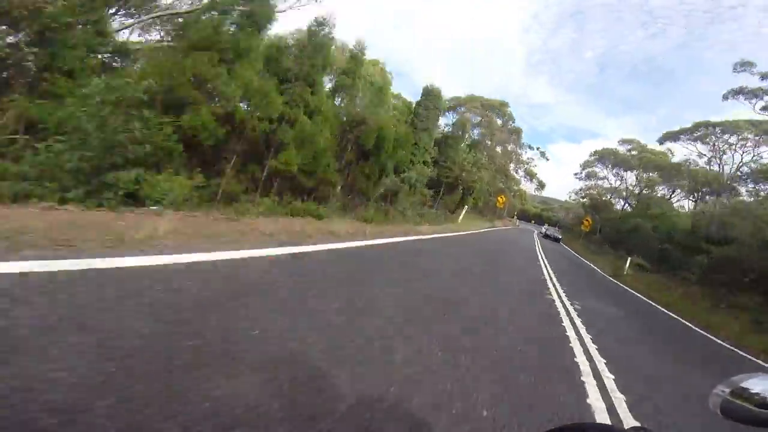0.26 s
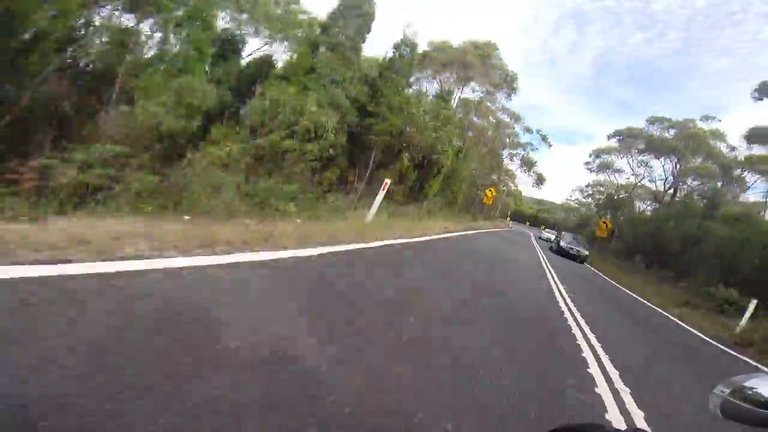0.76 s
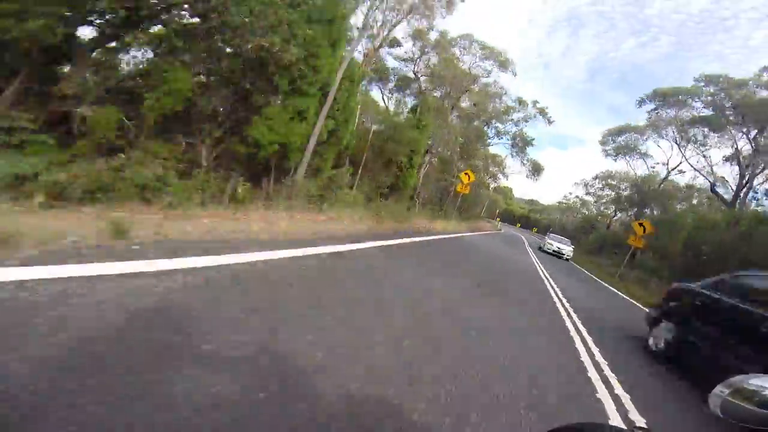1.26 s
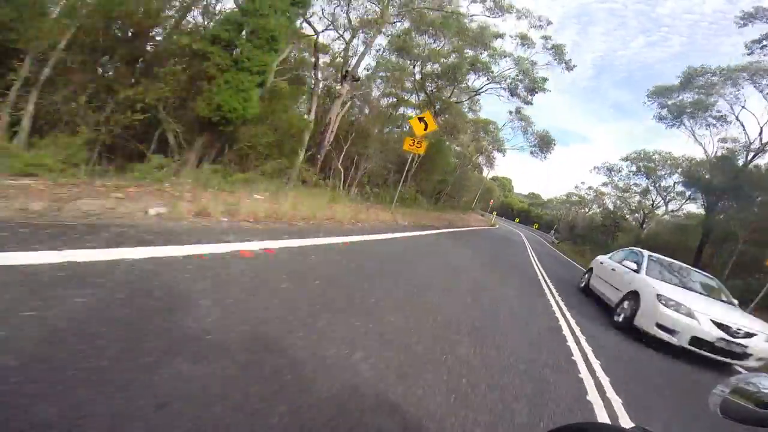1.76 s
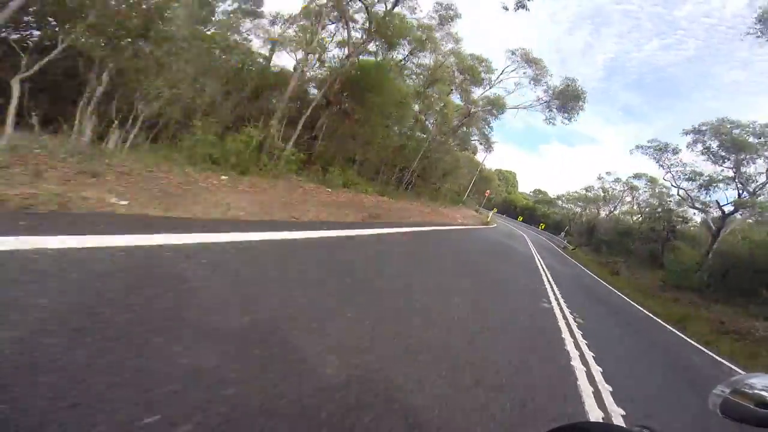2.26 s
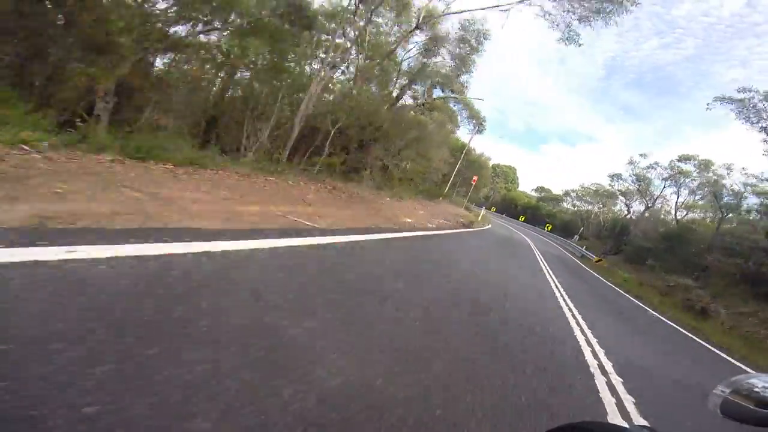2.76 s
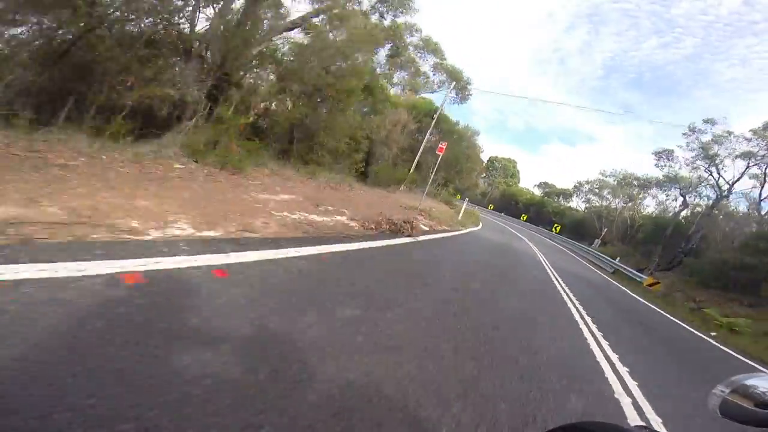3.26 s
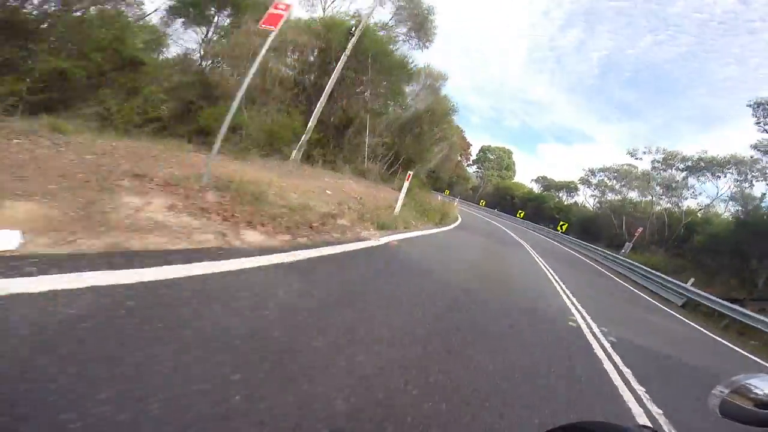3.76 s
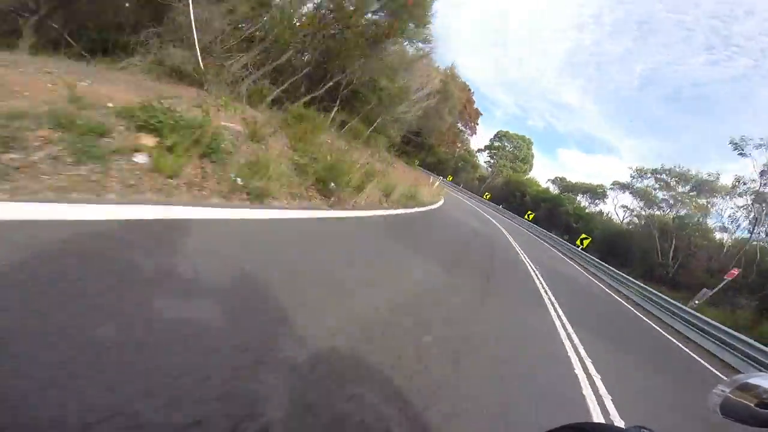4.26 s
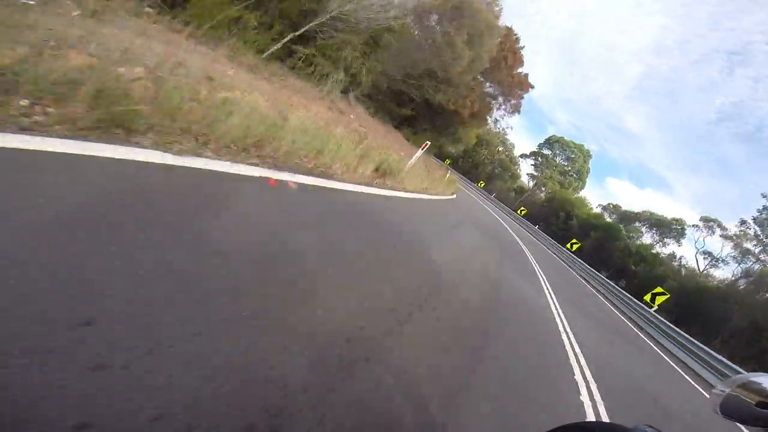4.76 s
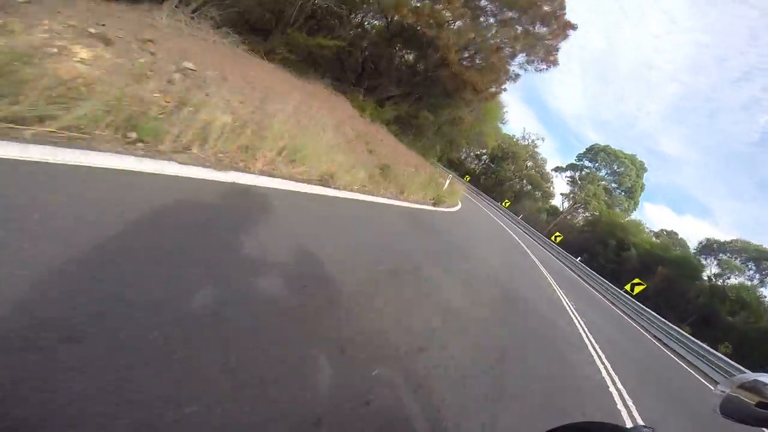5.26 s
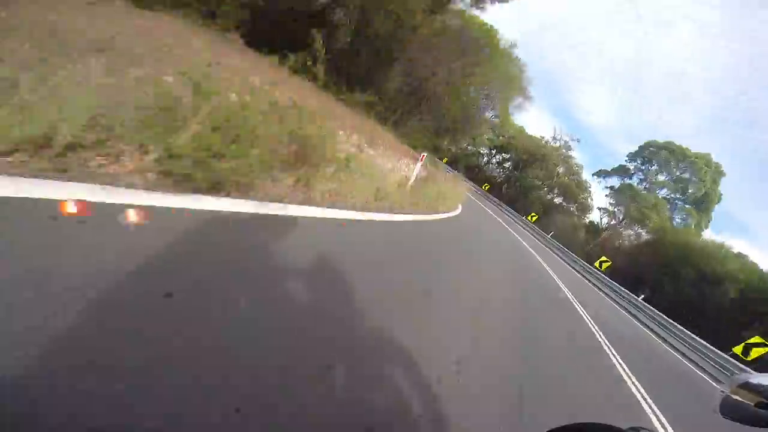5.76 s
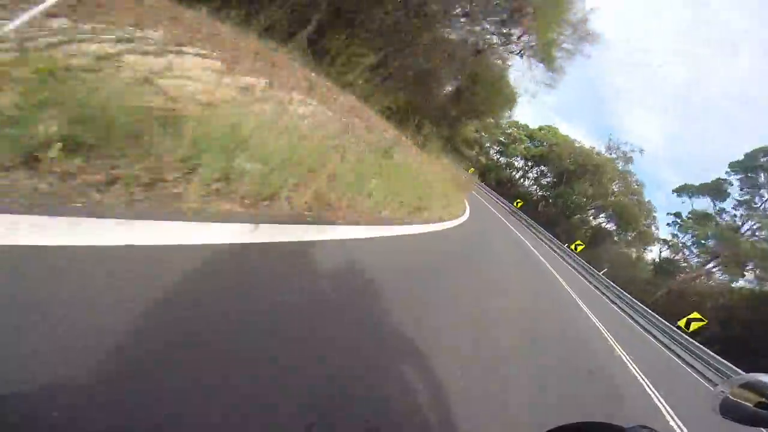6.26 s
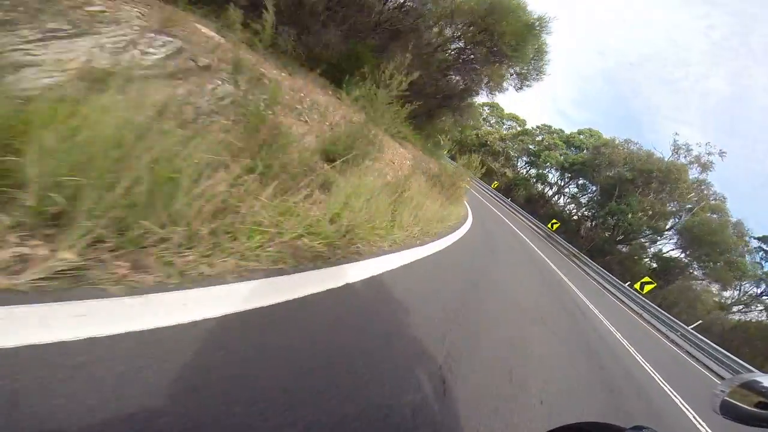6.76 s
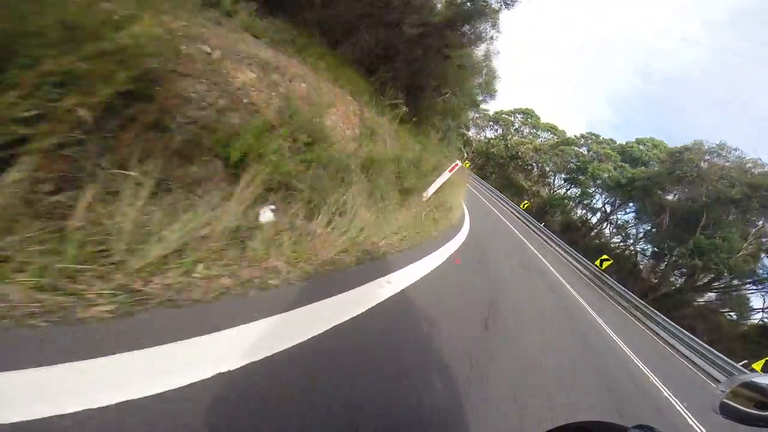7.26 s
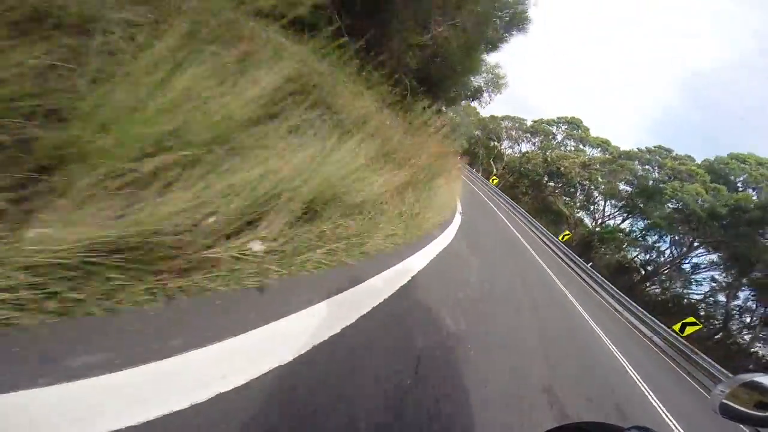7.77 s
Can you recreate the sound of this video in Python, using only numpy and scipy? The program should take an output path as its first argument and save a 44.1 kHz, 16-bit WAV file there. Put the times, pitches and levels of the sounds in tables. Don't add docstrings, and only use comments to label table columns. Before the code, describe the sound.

Muffled, boxy close sound of a V-twin motorcycle being ridden outdoors. Low throbbing engine vibration dominates, over lumpy tyre rumble and thin hiss. The pitch climbs slightly, blips downward at a gear change, slides lower while braking on the engine, then levels out. A tonal gear whine comes forward during slowing, while plasticky knocks and rattles become sparser.

```python
import sys
import numpy as np
from scipy import signal
from scipy.fft import rfft, irfft
from scipy.io import wavfile

SR = 44100
rng = np.random.default_rng(int(sys.argv[2]) if len(sys.argv) > 2 else 0)


def transcribe(signal):
    frames = np.atleast_2d(signal).T
    limited = np.clip(frames, -1, 1)
    pcm = np.round(limited * 32767).astype(np.int16)
    wavfile.write(sys.argv[1], SR, pcm)


def boost_factor(decibels):
    exponent = np.asarray(decibels, float) / 20
    return 10 ** exponent


N = 353152
MIDDLE_SPEED = 35

# pitch_hz, level_db (per Hz)
CASE_COLOUR = [(300, -19), (480, -8.5), (590, -5), (720, 5.5), (930, -1.5), (1110, -9.5), (1390, 2.5),
               (1580, 1), (1740, -13), (2000, -15), (2400, -25), (2650, -22), (3050, -38), (12000, -48)]
# pitch_hz, width_hz, level_db
AIR_MODES = [(2600, 120, 3), (3620, 200, 7), (4550, 200, 7), (5900, 250, 8), (7050, 450, 10)]
# multiple (of the cycle rate), level_db, pulling_change_db, braking_change_db
STRONG_ORDERS = [(2, -1.5, -1, 1), (3, -5.5, 2, -9), (4, 0.5, -3, 0), (8, 0.5, -8, .5)]


def rms_one(x):
    return x / np.sqrt(np.mean(x ** 2) + 1e-20)


def in_time(rows):
    s, *columns = np.transpose(rows)
    return [np.interp(np.arange(N) / SR, s, column) for column in columns]


def at_hz(points, hz):
    point_hz, point_db = np.transpose(points)
    return np.interp(np.log(np.maximum(hz, 1)), np.log(point_hz), point_db)


def drift(rate):
    r = np.exp(-80 * np.pi * rate / SR)
    slow = signal.lfilter([1], [1, -2 * r, r * r], rng.standard_normal(N // 40 + 2002))[2000:]
    return np.interp(np.arange(N) / 40, np.arange(len(slow)), rms_one(slow))


def colour(x, points, modes=()):
    size = 16384
    hz = np.arange(size // 2 + 1) * SR / size
    db = at_hz(points, hz)
    for mode_hz, width_hz, peak_db in modes:
        db = db + peak_db / (1 + (2 * (hz - mode_hz) / width_hz) ** 2)
    cepstrum = irfft(np.log(boost_factor(db)), size)
    cepstrum[1:size // 2] *= 2
    cepstrum[size // 2 + 1:] = 0
    response = irfft(np.exp(rfft(cepstrum)), size)[:size // 2]
    return signal.fftconvolve(x, response)[:N]


def order(cycles, multiple, level_db, wobble_db, wander, rate, spread=1):
    phase = 2 * np.pi * (multiple * cycles + spread * rng.random()) + wander * drift(rate)
    return -np.sqrt(2) * boost_factor(level_db + wobble_db * drift(rate)) * np.cos(phase)


def engine_speed():
    # time_s, speed (cycles per s)
    revs = [(0.0, 38.97), (0.48, 39.3), (0.62, 40.02), (1.34, 41.5), (1.8, 40.35), (2.35, 38.62),
            (2.65, 36.95), (2.95, 35.7), (3.7, 33.2), (4.3, 30.85), (4.75, 30.35), (4.9, 29.7),
            (5.5, 29.75), (6.4, 29.75), (6.9, 29.1), (7.05, 28.7), (7.6, 28.42), (8.01, 29.17)]
    shift_s, sag_cycles, spread_s = 1.625, 2.5, 0.058
    sag = sag_cycles * np.exp(-0.5 * ((np.arange(N) / SR - shift_s) / spread_s) ** 2)
    return in_time(revs)[0] - sag + 0.05 * drift(4.0)


def with_load(pull_db, brake_db):
    # time_s, load (1 pulling, 0 coasting along, -1 engine braking)
    throttle = [(0, -0.11), (.6, 0.21), (.75, 1), (1.45, .9), (1.58, -.7), (2.5, -0.99), (3.5, -1.3),
                (4.1, -1.2), (4.8, -0.81), (5.25, -0.77), (5.4, 0.032), (6.2, 0.24), (6.9, 0.13),
                (7.4, 0.22), (7.7, .2), (8.01, 0.19)]
    load, = in_time(throttle)
    return pull_db * np.maximum(load, 0) + brake_db * np.maximum(-load, 0)


def strong_db(row, speed):
    # pitch_hz, level_db
    sway = [(58, -30), (70, -15), (82, -17.5), (100, -16.5), (119, -10.5), (136, -16.5), (152, -25.5),
            (168, -22)]
    # pitch_hz, level_db
    buzz = [(228, -31.5), (255, -32.5), (275, -23.5), (300, -20.5), (330, -22)]
    multiple, db, pull_db, brake_db = row
    response_db = at_hz(sway if multiple < 6 else buzz, round(multiple) * speed)
    return db + with_load(pull_db, brake_db) + response_db


def background(speed, db, per_speed_db, roughness_share, patchy_db):
    # time_s, level_db
    roughness = [(0, 8), (.2, 3.5), (.6, 0.5), (1.05, -5), (1.5, -0.5), (2.0, -3.5), (2.55, 2.5), (3.0, -3),
                 (3.5, .0), (4.0, -3), (4.6, -3), (5.2, .0), (5.7, .0), (6.2, -2), (6.9, 3), (7.5, 6.5),
                 (7.75, -0.5), (8.01, 7)]
    speed_db = per_speed_db * (speed - MIDDLE_SPEED)
    return db + speed_db + roughness_share * in_time(roughness)[0] + patchy_db * drift(3.0)


def road(speed):
    # pitch_hz, level_db (per Hz)
    rumble_colour = [(15, -25), (30, -8.5), (50, -5.5), (75, 4), (100, -1.5), (130, 2), (175, -4.5),
                     (205, -7.5), (230, -15.5), (300, -9.5), (400, -18), (470, -22), (600, -59)]
    # pitch_hz, level_db (per Hz)
    ring_colour = [(100, -38), (150, -6.5), (175, 6.5), (195, 1.5), (215, -17.5), (300, -53.5)]
    rumble_db = background(speed, db=-25, per_speed_db=0.35, roughness_share=0.66, patchy_db=1.5)
    ring_db = background(speed, db=-33, per_speed_db=0.88, roughness_share=0.45, patchy_db=2)
    rumble = rms_one(colour(rng.standard_normal(N), rumble_colour))
    rumble *= boost_factor(rumble_db + 2.5 + 1.3 * drift(5.7))
    ring = boost_factor(ring_db + 0.5) * rms_one(colour(rng.standard_normal(N), ring_colour))
    return signal.sosfilt(signal.butter(6, 800, fs=SR, output="sos"), rumble + ring)


def tread():
    # time_s, pitch_hz, level_db
    hum = [(0, 167, -25), (.6, 170.3, -23.5), (1.5, 175.6, -26), (1.9, 173, -21.5), (2.3, 168, -26.5),
           (2.7, 164.6, -20.5), (3.2, 157.4, -39.5), (8.01, 132.5, -48.5)]
    hz, db = in_time(hum)
    return order(np.cumsum(hz) / SR, 1, db, wobble_db=3.0, wander=0.43, rate=9.5)


def case_hiss(cycles, speed):
    # pitch_hz, level_db
    air_tilt = [(500, -1), (650, -10.5), (1600, -5), (2000, -2.5), (4000, -2), (7300, -1), (8000, -9),
                (10000, -6), (12500, -26)]
    clatter_db = background(speed, db=-44, per_speed_db=0.6, roughness_share=0.5, patchy_db=1.5)
    wind_db = background(speed, db=-63, per_speed_db=0.39, roughness_share=0.5, patchy_db=0.2)
    swell = boost_factor(1.5 * np.sin(4 * np.pi * cycles) + 1.2 * drift(25))
    hiss = colour(colour(swell * rng.standard_normal(N), air_tilt), CASE_COLOUR, AIR_MODES)
    clatter = signal.sosfilt(signal.butter(5, 3000, fs=SR, output="sos"), hiss)
    wind = signal.sosfilt(signal.butter(5, [2850, 11000], "band", fs=SR, output="sos"), hiss)
    return boost_factor(clatter_db + 8.5) * rms_one(clatter) + boost_factor(wind_db + 0.5) * rms_one(wind)


def knock_runs(speed):
    # start_s, peak_db
    hard_knocks = [(0.329, -18), (0.398, -24), (0.4319, -23), (0.5502, -18.5), (0.576, -16.5),
                   (0.8737, -21), (0.9211, -30), (1.0293, -24), (1.2153, -27.5), (1.273, -35),
                   (1.3094, -21.5), (1.5409, -31), (1.5893, -18.5), (1.643, -15.5), (1.8952, -26),
                   (2.3503, -27), (2.5075, -11.5), (2.5443, -29), (2.6262, -22.5), (2.6828, -22),
                   (2.7244, -22.5), (2.7686, -31.5), (2.8893, -20), (3.7918, -21.5), (3.822, -37.5),
                   (3.9765, -24.5), (4.0423, -23.5), (4.0728, -23.5), (4.7546, -31), (5.9484, -27)]
    light_per_s = 10.5 * boost_factor(2.1 * (speed - MIDDLE_SPEED))
    light = np.flatnonzero(rng.random(N) < light_per_s / SR)
    light_db = -29 + 4 * rng.standard_normal(N)[light]
    hard_s, hard_db = np.transpose(hard_knocks)
    starts = np.r_[np.round(hard_s * SR).astype(int), light]
    levels = np.r_[hard_db + 5.0, light_db]

    run_s, density, main_contact, main_contact_s = 0.0039, 0.069, 4.4, 0.0012
    shape = np.sin(np.pi * np.clip(np.arange(400) / SR / run_s, 0, 1)) ** 1.1
    runs = shape * (rng.random((200, 400)) < density) * rng.standard_normal((200, 400))
    runs[:, int(main_contact_s * SR)] = -main_contact
    out = np.zeros(N + 400)
    for start, level, run in zip(starts, levels, runs):
        out[start:start + 400] += boost_factor(level) * run / np.sqrt(np.sum(run ** 2) + 1e-9)
    return out[:N]


def ticks_and_knocks(motion, speed):
    # pitch_hz, level_db (per Hz)
    tick_colour = [(300, -12), (1000, -1.5), (1700, 2.5), (2300, -1.5), (3000, -20.5), (4500, -26),
                   (5500, -29.5), (7000, -44), (8000, -43.5), (11000, -44.5), (13000, -63)]
    beyond = (motion < -0.49) | (motion > 0.6)
    crossings = np.flatnonzero(np.diff(beyond))
    ticks = np.zeros(N)
    tick_gain = boost_factor(-25 + 3.5 * rng.standard_normal(N)[crossings])
    ticks[crossings] = tick_gain * np.diff(motion)[crossings] * 10
    bright = colour(ticks, [(1500, -4.5), (3000, 13), (8000, 21.5)])
    unit = np.max(np.abs(colour(np.eye(1, N)[0], tick_colour)))
    return colour(bright + knock_runs(speed), tick_colour, AIR_MODES[1:]) / unit


def valve_gear(cycles, speed):
    # share (of the cycle), level_db
    contacts = [(0.019, -2), (0.193, 1), (0.313, 0), (0.42, 1), (0.538, -4), (.62, 4.5), (0.718, 4),
                (0.861, 3.5)]
    # pitch_hz, width_hz, level_db
    panel_modes = [(712, 14, 2.5), (931.5, 29, 7.5)]
    taps_db = background(speed, db=-41.5, per_speed_db=0.14, roughness_share=0.25, patchy_db=1.5)
    clicks = np.zeros(N)
    turns = np.arange(int(cycles[-1]))
    for share, db in contacts:
        moments = turns + share + 0.0018 * rng.standard_normal(len(turns))
        at = np.interp(moments, cycles, np.arange(N)).astype(int)
        clicks[at] += boost_factor(db + 2.6 * rng.standard_normal(len(turns)))
    dull = signal.sosfilt(signal.butter(4, 1900, fs=SR, output="sos"), clicks)
    return boost_factor(taps_db + 4.5) * rms_one(colour(dull, CASE_COLOUR, panel_modes))


def bearing_db():
    # start_s, length_s, level_db (at the start), swell_db_per_s
    spells = [
        (1.66, 1, -43, 3),
        (2.911, 2.37, -39.5, -.5),
        (6.2, 1.45, -38, -0.5),
        (6.985, .67, -34.5, 5),
    ]
    edge_s, slack_db = 0.065, -55.5
    t = np.arange(N) / SR
    gain = boost_factor(slack_db)
    for start, length, db, swell_db in spells:
        inside_s = np.minimum(t - start, start + length - t)
        gain = gain + boost_factor(db + swell_db * (t - start)) * np.clip(inside_s / edge_s + 0.5, 0, 1)
    return 20 * np.log10(gain)


def gears(cycles, speed):
    # pitch_hz, level_db
    small_mesh = [(830, -1.5), (890, -1), (945, 4), (1010, -4.5), (1080, -5), (1125, 5)]
    # pitch_hz, level_db
    large_mesh = [(975, -45.5), (1010, -55.5), (1080, -50), (1200, -39), (1270, -37), (1310, -29.5),
                  (1400, -28)]
    # pitch_hz, level_db
    side_line = [(640, -34.5), (675, -18), (730, -16)]
    # pitch_hz, level_db
    upper_mesh = [(2380, -34), (2520, -20.5), (2750, -31), (4300, -55), (4550, -31.5), (4750, -46.5)]
    # pitch_hz, level_db
    panel_line = [(900, -60.5), (935, -46.5), (960, -46.5), (1000, -59)]
    small_db = bearing_db() + at_hz(small_mesh, 28 * speed)
    large_db = at_hz(large_mesh, 34 * speed)
    octave_dip = [(1650, 7), (1880, -2.5), (2050, 7.5), (2300, 3.5)]
    small_side = [(1040, -17), (1180, -7.5), (1300, -14)]
    lines = [
        (28, small_db),
        (56, small_db - 20.0 + at_hz(octave_dip, 56 * speed)),
        (72, small_db - 29.0),
        (36, small_db + at_hz(small_side, 36 * speed)),
        (34, large_db),
        (36, large_db - 14.5),
        (32, at_hz(panel_line, 32 * speed)),
        (33, at_hz(panel_line, 33 * speed)),
        (84, small_db + at_hz(upper_mesh, 84 * speed)),
        (140, small_db + at_hz(upper_mesh, 140 * speed)),
        (38, large_db - 12.5),
        (17, large_db - 14.5),
        (18, strong_db(STRONG_ORDERS[-1], speed) + at_hz(side_line, 18 * speed))]
    return sum(order(cycles, k, db, wobble_db=0.9, wander=0.2, rate=12) for k, db in lines)


def shaking(cycles, speed):
    # multiple (of the cycle rate), level_db
    weak_orders = [(1, -35.5), (5, -35), (6, -27), (7, -36), (9, -31), (10, -38), (11, -32), (12, -36.5),
                   (13, -36), (14, -35.5), (15, -37.5), (16, -44.5)]
    # pitch_hz, level_db
    frame_response = [(25, -4), (40, -2), (150, -7), (185, -3), (213, -7.5), (238, -3.5), (260, 0.5),
                      (300, 9), (340, -4), (400, -3.5), (450, -17), (520, -16.5), (650, -11.5)]
    lag = 0.08 * np.clip((4 * speed - 135) / 30, 0, 1)
    out = np.zeros(N)
    for row in STRONG_ORDERS[:3]:
        k = round(row[0])
        out += order(cycles - lag * (k > 3), k, strong_db(row, speed),
                     wobble_db=0.74, wander=0.17, rate=12.0, spread=0.12)
    out += order(cycles, 8, strong_db(STRONG_ORDERS[-1], speed),
                 wobble_db=2.17, wander=0.079, rate=9.5, spread=0.07)
    low_db = with_load(pull_db=-3, brake_db=0)
    high_db = with_load(pull_db=-3.5, brake_db=-0.5)
    for multiple, db in weak_orders:
        k = round(multiple)
        level_db = db + (low_db if k < 8 else high_db) + at_hz(frame_response, k * speed)
        if k == 6:
            level_db = level_db + with_load(pull_db=0, brake_db=4)
        out += order(cycles, k, level_db, wobble_db=2.0, wander=0.49, rate=4.2)
    return out


def scene():
    speed = engine_speed()
    cycles = np.cumsum(speed) / SR
    motion = road(speed) + tread() + shaking(cycles, speed)
    body = case_hiss(cycles, speed) + valve_gear(cycles, speed) + gears(cycles, speed)
    return (motion + body + ticks_and_knocks(motion, speed))[None]


def low_pass(x):
    return signal.sosfilt(signal.butter(12, 15700, fs=SR, output="sos"), x)


def record(dry):
    top = 0.95
    rounded = top * dry / (1 + np.abs(dry / top) ** 8) ** (1 / 8)
    microphone_top_hz = 11500
    dulling = signal.cheby2(8, 30, microphone_top_hz * 1.1, fs=SR, output="sos")
    return low_pass(signal.sosfilt(dulling, rounded))


dry = scene()
out = record(dry)
transcribe(out)
```